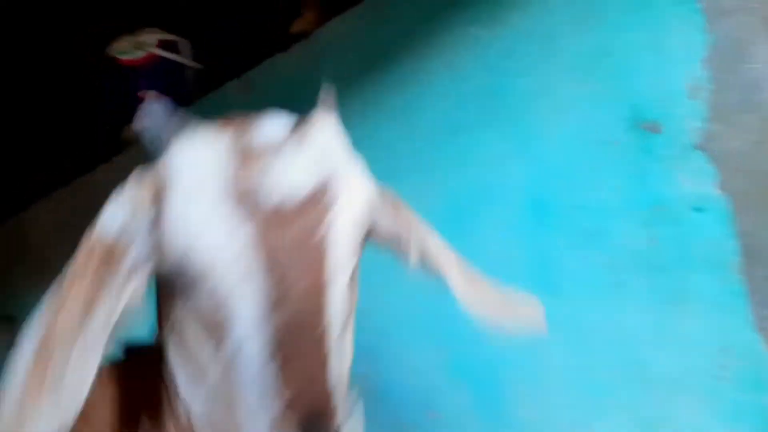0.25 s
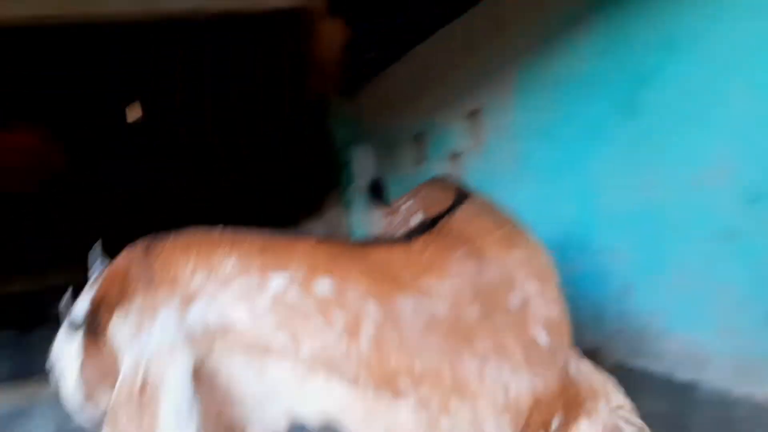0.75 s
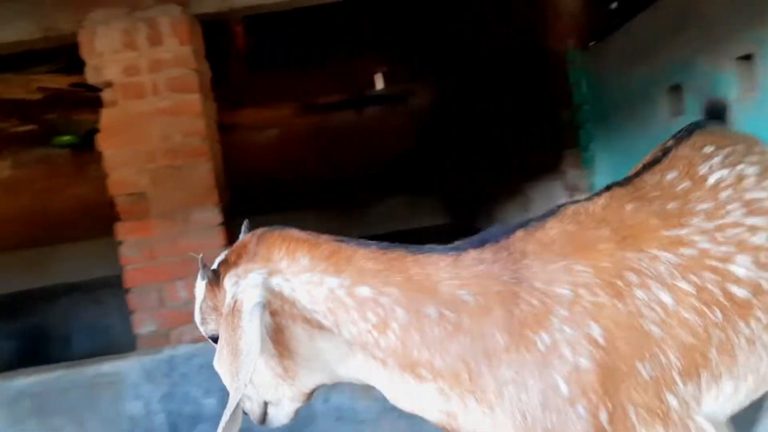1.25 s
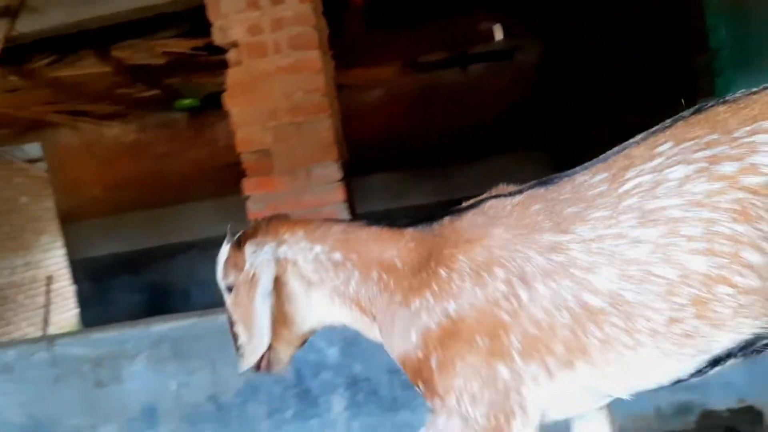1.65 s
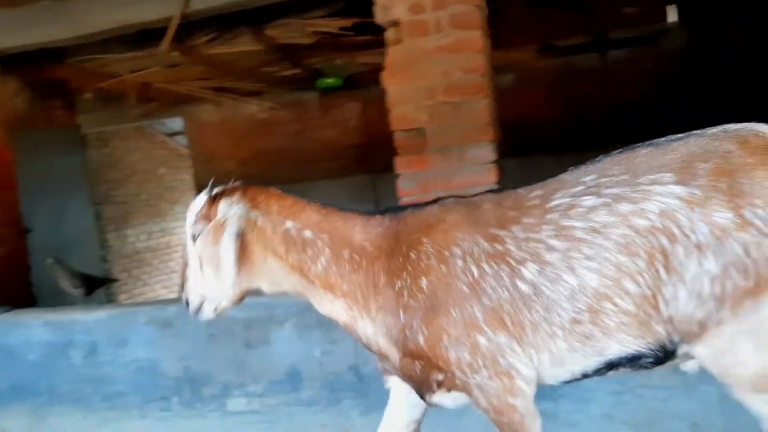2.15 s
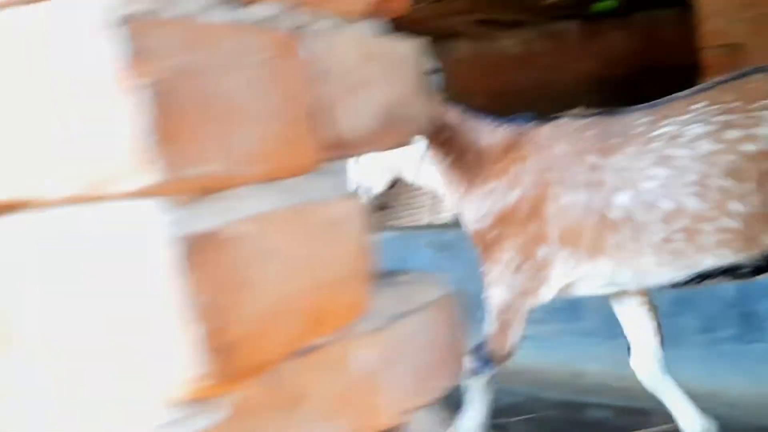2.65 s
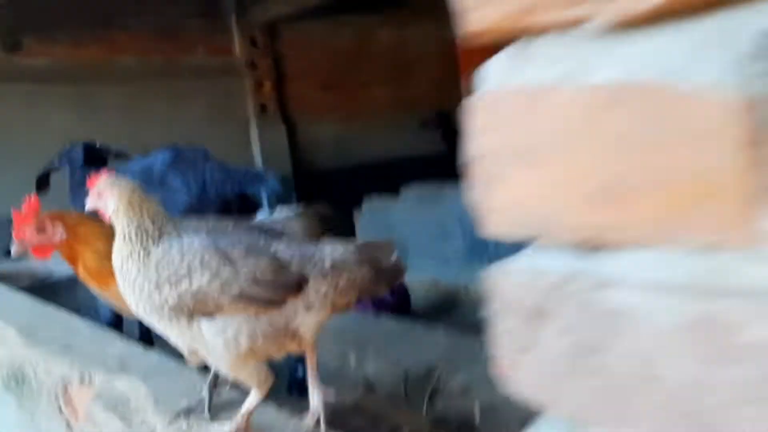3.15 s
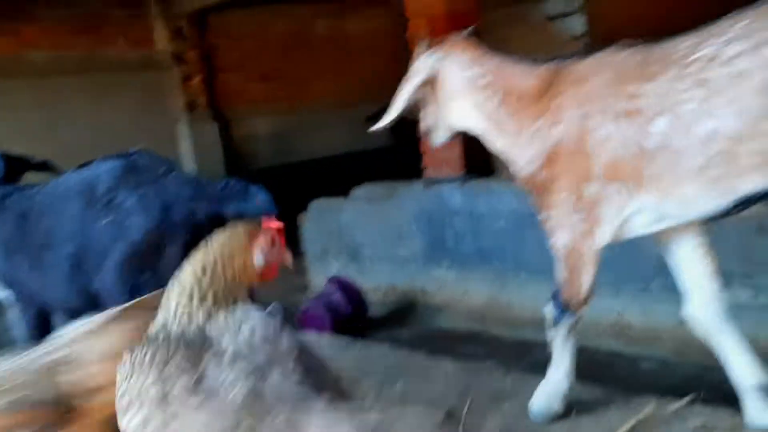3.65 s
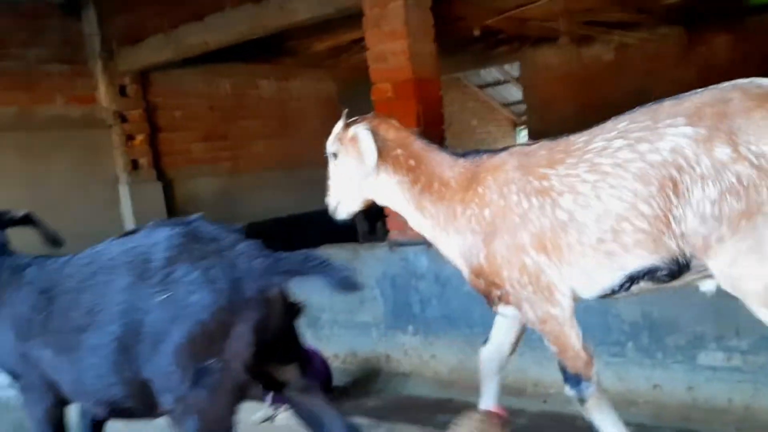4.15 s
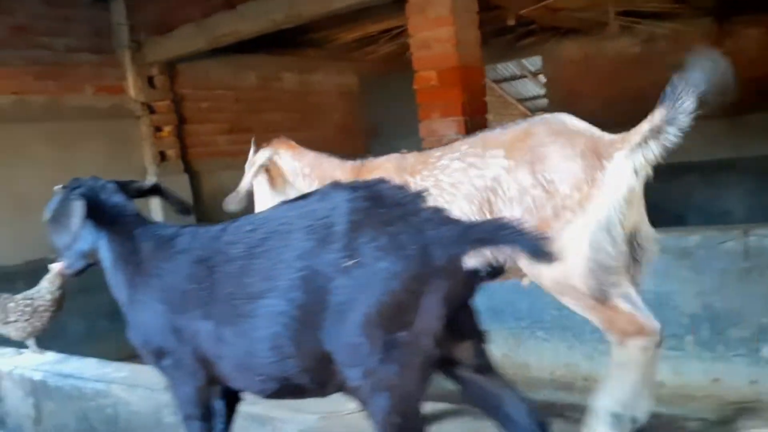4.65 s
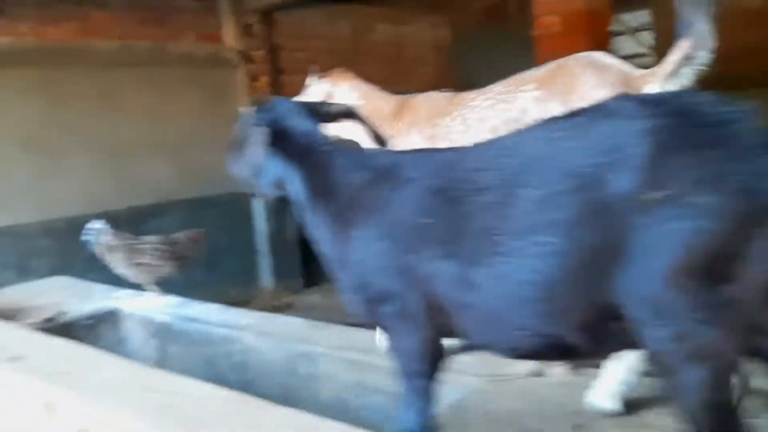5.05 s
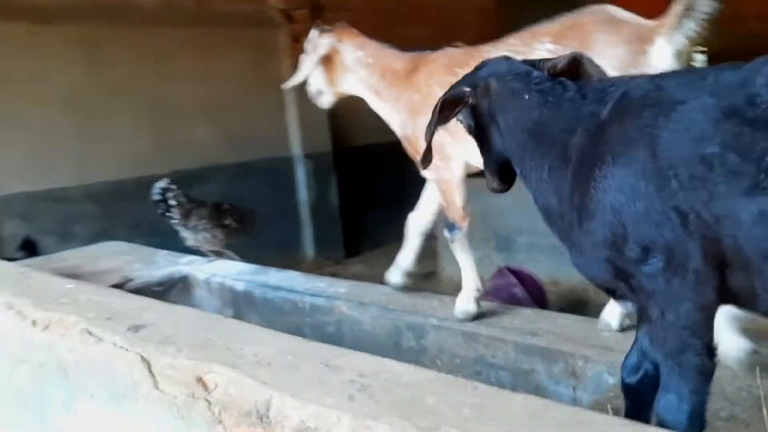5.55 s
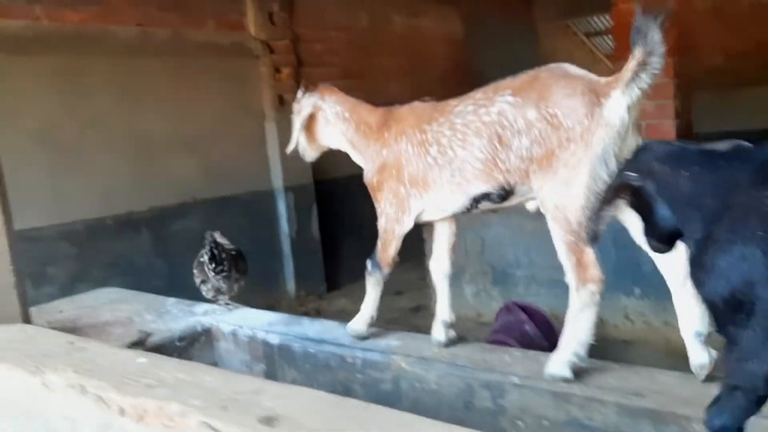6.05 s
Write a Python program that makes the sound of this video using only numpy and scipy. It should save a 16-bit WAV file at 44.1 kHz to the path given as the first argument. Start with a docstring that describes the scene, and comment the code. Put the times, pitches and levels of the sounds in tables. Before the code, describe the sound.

A near kid goat gives three loud quavering bleats, answered by other kids, with chick peeps, hen clucks and hooves scuffing on a hard floor.

```python
"""Chicks peep over a treble hiss and a low murmur; then young goats bleat in an echoing shed.
A near kid bleats three times, another once, a far one twice; hens cluck, hooves knock and scuff.
Voices are drifting partials plus breath through throat resonances; peeps are gliding whistles.
Hooves are decaying filtered noise, the bed is random spectra, walls are sparse decaying echoes.
Table levels are those ahead of the mix gains."""
import sys
import numpy as np
from scipy import signal
from scipy.fft import rfft, irfft, next_fast_len
from scipy.io import wavfile
from scipy.ndimage import uniform_filter1d

SR = 44100
rng = np.random.default_rng(int(sys.argv[2]) if len(sys.argv) > 2 else 0)


def output_pcm(signal):
    """Save a mono or channel-first signal as 16-bit PCM at the path in sys.argv[1].

    Samples are clipped to [-1, 1] before scaling.
    """
    pcm = np.clip(np.atleast_2d(signal).T, -1, 1) * 32767
    wavfile.write(sys.argv[1], SR, np.round(pcm).astype(np.int16))


N = 278271


def amp(db):
    """Amplitude ratio of a level in dB."""
    return 10 ** (np.asarray(db) / 20)


def evened(x):
    """Scale to rms 1."""
    return x / np.sqrt(np.mean(x ** 2) + 1e-20)


def read(points, hz):
    """Interpolate a (Hz, value) table along log frequency."""
    f, value = np.transpose(points)
    return np.interp(np.log(hz + 1), np.log(f + 1), value)


def add(mix, start_s, sound):
    """Add a sound to a track in place, cut at the track's end."""
    part = mix[round(start_s * SR):][:len(sound)]
    part += sound[:len(part)]


def wobble(size, hz):
    """Smoothed noise of rms 1, changing about hz times a second."""
    span = max(int(SR / hz), 1)
    once = uniform_filter1d(rng.standard_normal(size), span)
    return evened(uniform_filter1d(once, span))


# likeness of the noise at both sides: freq_hz, likeness_0_to_1
SIDE_LIKENESS = [(60, .95), (400, 0.85), (1000, 0.17), (2500, 0.51), (8000, 0.26)]


def noise(spectrum, lo_hz, hi_hz, patchy_db, flicker_db, size):
    """Stereo noise from random short-time spectra in patches, of rms 1 between lo_hz and hi_hz."""
    frames = 4 * N // size + 6
    hz = np.fft.rfftfreq(size, 1 / SR)
    a, b, c, d, patches = rng.standard_normal((frames, len(hz), 5)).T
    patches = uniform_filter1d(patches, 8, axis=0)  # across frequency, then time
    patches = evened(uniform_filter1d(patches, 20, axis=1))
    flicker = evened(uniform_filter1d(rng.standard_normal(frames), 4))
    same = read(SIDE_LIKENESS, hz)[:, None]
    left = a + 1j * b
    right = same * left + np.sqrt(1 - same ** 2) * (c + 1j * d)
    z = np.array([left, right])
    z *= amp(read(spectrum, hz)[:, None] + patchy_db * patches + flicker_db * flicker)
    band = (hz >= lo_hz) & (hz <= hi_hz)
    share = np.sqrt((abs(z[:, band]) ** 2).sum() / (abs(z) ** 2).sum())
    sound = signal.istft(z, nperseg=size, noverlap=3 * size // 4)[1][:, :N]
    return evened(sound) / share


# level of the treble hiss (stirred litter, and the kids' breath while they bleat): time_s, level_db
HISS = [(0, -60), (.2, -65), (.87, -67), (1.15, -51.5), (1.72, -48.5), (1.86, -61.5), (2.22, -51.5),
        (3.0, -51.5), (3.14, -58.5), (3.2, -45), (3.92, -53), (4.02, -57), (5.21, -67), (5.33, -55.5),
        (6.0, -48.5), (6.17, -60)]
# single rustles of litter: crest_s, level_db, fade_db_per_s
RUSTLES = [(0.449, -57, 98), (.7, -59, 130), (0.901, -53.5, 48), (1.955, -48, 74), (2.1, -59, 65),
           (4.2, -52.5, 60), (4.33, -46.5, 23), (4.68, -47, 38), (6.282, -48, 30)]
# swells of the shed's murmur: time_s, level_db
BUSTLE = [(0.0, -62), (0.54, -66.5), (1.19, -48), (1.69, -54), (3.6, -52.5), (4.78, -64), (5.31, -58),
          (5.52, -50.5), (6.31, -59.5)]
# noise spectra of hiss, murmur and rumble: freq_hz, density_db_per_hz
HISS_SPECTRUM = [(350, -68), (600, -99), (748, -65), (1140, -9), (1230, -5), (3080, 4.5), (3730, 7.5),
                 (9240, -2.5), (14900, -2), (16000, 1)]
MURMUR_SPECTRUM = [(120, -32), (200, -10), (481, -3.5), (620, -3.5), (1050, -8), (1280, -9.5), (2500, -10),
                   (3250, -6.5), (5500, -120)]
RUMBLE_SPECTRUM = [(12, -47), (20, -41), (70, 5), (156, -0.5), (200, -3.5), (260, -9), (440, -120)]
RUSTLE_RISE_DB_PER_S = 350
RUMBLE_DB = -68


def background():
    """Treble hiss of litter and breath over the shed's murmur; a rumble follows the murmur a little."""
    t = np.arange(N) / SR
    hiss_db = np.interp(t, *np.transpose(HISS))
    murmur_db = np.interp(t, *np.transpose(BUSTLE))
    rumble_db = RUMBLE_DB + .3 * (murmur_db - murmur_db.mean())
    power = amp(hiss_db) ** 2
    for crest_s, db, fade_db_per_s in RUSTLES:
        drop_db = np.maximum(RUSTLE_RISE_DB_PER_S * (crest_s - t), fade_db_per_s * (t - crest_s))
        power += amp(db - drop_db) ** 2
    hiss = noise(HISS_SPECTRUM, 8400, 15100, patchy_db=1, flicker_db=1.5, size=512)
    murmur = noise(MURMUR_SPECTRUM, 200, 900, patchy_db=2.5, flicker_db=2, size=1024)
    rumble = noise(RUMBLE_SPECTRUM, 30, 200, patchy_db=-2.5, flicker_db=3.0, size=2048)
    return np.sqrt(power) * hiss + amp(murmur_db) * murmur + amp(rumble_db) * rumble


# decay of the shed's echo: freq_hz, t60_s
WALL_DECAY = [(200, 0.39), (1000, 0.41), (4000, 0.34), (10000, 0.11)]


def walls(x):
    """Sparse echoes of random sign, unlike at each side, each band dying at its own speed."""
    taps = np.zeros((2, SR // 2))
    slots = np.arange(200, SR // 2 - 20, 20)
    at = slots + rng.integers(0, 20, (2, (SR // 2 - 201) // 20))
    np.put_along_axis(taps, at, rng.choice([-1., 1.], at.shape), 1)
    hz, t, z = signal.stft(taps, SR, nperseg=256)
    decay = amp(-60 * t / read(WALL_DECAY, hz)[:, None])
    tail = signal.istft(z * decay, SR, nperseg=256)[1]
    return signal.fftconvolve(x[None], tail / np.linalg.norm(tail[0]), axes=1)[:, :N]


# first reflections off floor, trough and pillar, one list per side (left, right): delay_s, level_db
BOUNCES = [
    [(.0016, -7), (.0043, -12.5), (.0091, -6), (.015, -5)],
    [(.0023, -8), (.0056, -11), (.0078, -8), (.018, -3.5)],
]


def nearby(x):
    """Early reflections, mostly treble, reach each port at other moments."""
    treble = signal.lfilter(*signal.butter(1, 500, "high", fs=SR), x)
    out = x.copy()
    for side, taps in enumerate(BOUNCES):
        for delay_s, db in taps:
            add(out[side], delay_s, amp(db) * treble[side][:N - round(delay_s * SR)])
    return amp(-1.0) * out


# hoof knocks: start_s, level_db, tick_db (against the body)
KNOCKS = [(0.359, -46, -12), (0.968, -35.5, -20), (2.148, -31, -4), (2.299, -33, -8), (4.194, -27.5, 4),
          (4.242, -45, -15)]
# hoof scuffs: start_s, level_db, centre_hz
SCUFFS = [(0.136, -49, 744), (0.294, -44.5, 1240), (0.97, -31.5, 1730), (2.289, -32.5, 1150),
          (4.443, -37, 882), (4.494, -38, 760), (4.584, -46, 607), (4.957, -43.5, 815), (4.99, -32.5, 780),
          (5.33, -31, 1030), (5.375, -34, 1140), (6.17, -42, 1000), (6.279, -37, 690)]
KNOCK_HZ, KNOCK_WIDTH_HZ, KNOCK_T60_S, KNOCK_RISE_S = 298, 490, .13, .0013
SCUFF_WIDTH_HZ, SCUFF_T60_S, SCUFF_RISE_S, SCUFF_TICK_DB = 920, 0.18, .006, -23
TICK_T60_S = 0.054


def hooves():
    """A burst of grit rings the floor briefly; a bright tick leads it."""
    out = np.zeros(N)
    t = np.arange(8192) / SR
    f = np.fft.rfftfreq(len(t), 1 / SR)
    knocks = [(s, db, KNOCK_HZ, KNOCK_WIDTH_HZ, KNOCK_T60_S, KNOCK_RISE_S, tick_db)
              for s, db, tick_db in KNOCKS]
    scuffs = [(s, db, hz, SCUFF_WIDTH_HZ, SCUFF_T60_S, SCUFF_RISE_S, SCUFF_TICK_DB)
              for s, db, hz in SCUFFS]
    for s, db, hz, width_hz, t60_s, rise_s, tick_db in knocks + scuffs:
        grit = rng.standard_normal((2, len(t)))
        resonance = f / (f + 300) / (1 + (2 * (f - hz) / width_hz) ** 2)
        body = evened(irfft(rfft(grit[0]) * resonance))
        shape = (1 - np.exp(-t / rise_s)) * amp(-60 * t / t60_s)
        tick = amp(tick_db - 60 * t / TICK_T60_S) * grit[1]
        add(out, s, amp(db - 6.0) * (body * shape / shape.max() + tick))
    return out


# chick peeps: start_s, length_s, first_hz, last_hz, bend_exponent (over 1 holds then drops), level_db
PEEPS = [(0, 0.046, 4260, 4070, 3.2, -52), (0, 0.15, 5540, 3330, 1.27, -53.5),
         (0.098, 0.097, 4080, 3590, 0.48, -59), (0.206, 0.13, 4620, 3500, 1.83, -49.5),
         (0.303, 0.15, 5370, 3200, 2.1, -54), (.38, 0.092, 4630, 4100, .7, -55.5),
         (0.531, 0.15, 5670, 3280, 1.7, -60), (0.601, .16, 5120, 3500, 0.72, -50.5),
         (0.764, 0.11, 5200, 3770, 2.2, -53.5), (1.849, 0.079, 4560, 4070, 0.87, -49.5),
         (1.89, 0.055, 3970, 3310, 1.3, -44.5), (1.984, 0.092, 5160, 3970, 0.43, -49),
         (2.086, 0.13, 5450, 4130, 0.62, -51), (3.068, 0.062, 3580, 3260, 1.3, -52),
         (3.135, 0.073, 4186, 3630, 1.3, -36.5), (3.966, 0.092, 4165, 3630, 1.5, -46),
         (4.237, 0.14, 5480, 3980, 0.32, -43), (4.663, 0.13, 5600, 3660, .4, -43.5),
         (4.961, 0.099, 5180, 3540, 0.47, -55), (5.138, 0.087, 5470, 3900, 0.7, -58.5),
         (6.03, 0.1, 3716, 3190, 1.45, -52.5)]


def chicks():
    """Each peep is a slightly unsteady whistle that bends downward."""
    out = np.zeros(N)
    for s, length_s, first_hz, last_hz, bend, db in PEEPS:
        u = np.arange(int(length_s * SR)) / (length_s * SR)
        glide_hz = first_hz + (last_hz - first_hz) * u ** bend
        hz = glide_hz * (1 + 0.005 * wobble(len(u), 186))
        swell = np.sqrt(2 * np.sin(np.pi * u))
        add(out, s, amp(db) * swell * np.sin(2 * np.pi * np.cumsum(hz) / SR))
    return out


def throat_gain(throat, hz, progress):
    """Gain of a set of steep resonances, some drifting in the course of a call."""
    gain = 0
    for f, width_hz, db, *drift in throat:
        centre_hz = f * (1 + sum(drift) * progress)
        gain = gain + amp(db) / (1 + (2 * (hz - centre_hz) / width_hz) ** 2)
    return gain


STRAIN_DB, EASED_DB = 12, 5  # strain ends this far under peak effort; breath gained per unit of strain
CREAK = .8  # pitch unrest of a shut mouth, against full strain
CLEAR_COUNT, RASP_HZ = 3, 220  # lowest partials free of rasp; speed of the rasp
STEADY = (0, 1, 0)  # no quaver


def call(rows, throat, quaver, mouth_law, sag_db, calm_db, trough, jitter, breath_db, shut_db, rasp=0):
    """Vocal folds slacken between crests: pitch and level sag together; effort adds quaver and mouth."""
    s, effort_db, crest_hz = np.transpose(rows)
    crest_s, period_s, deepest = quaver
    widest, shut_below_db, opening_db = mouth_law
    t = np.arange(s[0], s[-1], 1 / SR)
    below_db = effort_db.max() - np.interp(t, s, effort_db)
    push = np.clip(1 - (below_db / calm_db) ** 2, 0, 1)
    strain = np.clip(1 - below_db / STRAIN_DB, 0, 1)
    mouth = widest * np.clip((shut_below_db - below_db) / opening_db, 0, 1)

    u = (t - crest_s) / period_s % 1
    dip = np.minimum(u / trough, (1 - u) / (1 - trough))
    slack = deepest * np.sin(np.pi / 2 * dip) ** 1.5
    # hoarse at full effort, creaky when shut
    unrest = jitter * (0.019 + deepest * (strain + CREAK * (1 - mouth)))
    hz = np.interp(t, s, crest_hz) * (1 - push * slack) * (1 + unrest * wobble(len(t), 152))
    turns = np.cumsum(hz) / SR

    k = np.arange(1, 30)[:, None]
    coarse = slice(None, None, 32)  # partial gains are set every 32 samples
    progress = (t - s[0]) / (s[-1] - s[0])
    gains = throat_gain(throat, k * hz[coarse], progress[coarse])
    gains *= amp(shut_db * (1 - mouth[coarse]) * np.log2(k))  # a shut mouth dulls
    gains /= np.sqrt((gains ** 2).sum(0) / 2)
    folds = np.zeros(len(t))
    for n, gain in zip(k[:, 0], gains):
        breakup = 1 + rasp * strain * (n > CLEAR_COUNT) * wobble(len(t), RASP_HZ)
        start_turn = (rasp > 0) * rng.random()
        partial = np.cos(2 * np.pi * (n * turns + start_turn))
        folds += np.interp(t, t[coarse], gain) * breakup * partial

    air = rng.standard_normal(len(t)) * (1 + np.cos(2 * np.pi * turns))  # puffs with each cycle
    f = np.fft.rfftfreq(len(t), 1 / SR)
    air = evened(irfft(rfft(air) * throat_gain(throat, f, 0.23) * f / (f + 2500), len(t)))
    breath = amp(breath_db - EASED_DB * (1.5 - strain)) * mouth ** 2 * air
    level_db = effort_db.max() - below_db - sag_db * np.sqrt(push) * slack
    return s[0], amp(level_db) * signal.windows.tukey(len(t), .05) * (folds + breath)


# hen clucks: start_s, length_s, peak_db, first_hz, last_hz, mouth_0_to_1
HENS = [(.635, 0.066, -49.5, 604, 640, 0.65), (0.722, 0.18, -38.5, 323, 303.5, 0.3),
        (0.956, 0.11, -31.5, 288, 345, 0.67), (2.919, .035, -31.5, 1052, 530, .63),
        (3.56, .035, -37, 800, 586, 0.2), (4.059, 0.0252, -35.5, 1138, 614, 0.99),
        (6.152, 0.15, -40.5, 415, 375, 1)]
# hen throat resonances: centre_hz, width_hz, level_db
HEN_THROAT = [(307, 44, 5), (737, 145, 3), (1300, 700, -12.5), (2440, 600, -22)]
CLUCK_RISE, CLUCK_START_DB, CLUCK_END_DB = 0.45, -11, -19  # swelling share; ends against the peak


def hens():
    """Each cluck is a breathy voice that swells and fades along one glide."""
    out = np.zeros(N)
    for s, length_s, db, first_hz, last_hz, mouth in HENS:
        peak_hz = first_hz + CLUCK_RISE * (last_hz - first_hz)
        rows = [(s, db + CLUCK_START_DB, first_hz),
                (s + CLUCK_RISE * length_s, db, peak_hz),
                (s + length_s, db + CLUCK_END_DB, last_hz)]
        held = (mouth, 60, 1)  # stays open all through
        add(out, *call(rows, HEN_THROAT, STEADY, held, sag_db=0, calm_db=1, trough=.5,
                       jitter=0.48, breath_db=-1.0, shut_db=-11))
    return out


# In the kids' settings below:
# quaver: crest_s, period_s, deepest_pitch_sag_0_to_1
# mouth: widest_0_to_1, shut_below_peak_db, opening_range_db

# far kid, one list per bleat: time_s, effort_db, crest_pitch_hz
FAR_KID = [
    [(.83, -49.5, 374.7), (.9, -48.5, 409.8), (1.07, -45.5, 440), (1.55, -53, 423), (1.68, -50, 405.4)],
    [(2.17, -40, 457.3), (2.44, -48.5, 486), (2.49, -35, 498.5), (2.72, -33.5, 487.2), (2.82, -49, 391)],
]
# far kid's throat resonances: centre_hz, width_hz, level_db
FAR_THROAT = [(480, 500, -36), (1011, 63, 2), (1234, 140, -7), (1943, 340, -6.5), (3620, 2400, -4)]
FAR_MOUTH = (0.84, 24.7, 18.7)


def far_kid():
    """Vocal folds without quaver, through a throat dulled as the mouth shuts."""
    out = np.zeros(N)
    for rows in FAR_KID:
        add(out, *call(rows, FAR_THROAT, STEADY, FAR_MOUTH, sag_db=0, calm_db=1, trough=.5,
                       jitter=.26, breath_db=-15, shut_db=-23))
    return out


# other kid's one bleat: time_s, effort_db, crest_pitch_hz
OTHER_KID = [(1.82, -59, 315), (1.95, -50.5, 335), (2.12, -43.5, 376.3), (2.19, -46, 396),
             (2.215, -29, 400), (2.357, -23.5, 431), (2.61, -22.5, 421), (2.79, -27, 401),
             (2.945, -30, 387.1), (3.035, -34, 345), (3.07, -50, 325)]
# other kid's throat resonances: centre_hz, width_hz, level_db, drift_share (where given, over the call)
OTHER_THROAT = [(420, 150, -30), (850, 200, -19), (1180, 120, -1.5, -.06), (2480, 250, -12),
                (2850, 250, -7), (3750, 450, 0, .19), (5800, 450, -16), (7000, 700, -19),
                (13000, 5000, -45)]
OTHER_QUAVER, OTHER_MOUTH = (2.527, .0848, .058), (0.97, 27, 22)


def other_kid():
    """Quavering folds with little breath, through a throat that drifts during the bleat."""
    out = np.zeros(N)
    add(out, *call(OTHER_KID, OTHER_THROAT, OTHER_QUAVER, OTHER_MOUTH, sag_db=75, calm_db=8,
                   trough=.22, jitter=.02, breath_db=-26, shut_db=-18))
    return out


# near kid, one list per bleat: time_s, effort_db, crest_pitch_hz
NEAR_KID = [
    [(1.07, -44.5, 411), (1.146, -37.5, 435.8), (1.222, -26, 477.4), (1.315, -15.5, 516.6),
     (1.4, -12.5, 497.2), (1.568, -15, 499), (1.654, -24.5, 470.8), (1.73, -26, 425), (1.765, -34, 327),
     (1.82, -54, 244.3)],
    [(3.13, -50, 362), (3.175, -36.5, 456), (3.215, -34, 484.6), (3.258, -12.5, 511.7),
     (3.345, -12.5, 537.1), (3.54, -13.5, 545), (3.66, -16.5, 515), (3.82, -22.5, 462.8), (3.875, -38, 404),
     (3.91, -37, 321.5), (3.98, -58, 337)],
    [(5.24, -48, 295), (5.3, -60, 296.5), (5.345, -37, 408.3), (5.41, -36, 457.5), (5.44, -14.5, 520),
     (5.524, -12.5, 533), (5.686, -14.5, 538.7), (5.856, -22, 485.5), (5.97, -39, 350.6), (6.06, -70, 322)],
]
# near kid's throat resonances: centre_hz, width_hz, level_db
NEAR_THROAT = [(447, 1600, -28.5), (1055, 135, 2), (1640, 300, -14), (2564, 246, -4.5), (3603, 1030, -3.5),
               (4400, 330, -6.5), (5320, 570, -15), (6660, 1570, -14), (8360, 460, -16.5),
               (12850, 2200, -30.5)]
# near kid's quaver, bleat by bleat: crest_s, period_s, deepest_pitch_sag_0_to_1
NEAR_QUAVER = [(1.4, 0.082, 0.08), (3.5, 0.08, 0.12), (5.605, .0812, .12)]
# near kid's hoarseness, bleat by bleat: sag_db_per_unit, jitter_scale, breath_db (before easing)
HOARSENESS = [(200, .11, -12), (110, .12, -9.5), (100, .13, -9.5)]
# near kid's main resonance, bleat by bleat, against its throat table: level_db
RING_DB = [-5, -.3, .3]
NEAR_MOUTH = (0.86, 34.3, 16)
NEAR_RASP = (.35, .7, .7)  # overtone flicker rms at full strain, bleat by bleat


def near_kid():
    """Quavering hoarse folds; strain breaks up the upper overtones."""
    out = np.zeros(N)
    bleats = zip(NEAR_KID, NEAR_QUAVER, HOARSENESS, NEAR_RASP, RING_DB)
    for rows, quaver, (sag_db, jitter, breath_db), rasp, ring_db in bleats:
        low, (hz, width_hz, db), *high = NEAR_THROAT
        throat = [low, (hz, width_hz, db + ring_db), *high]
        add(out, *call(rows, throat, quaver, NEAR_MOUTH, sag_db, calm_db=19, trough=0.403,
                       jitter=jitter, breath_db=breath_db, shut_db=-18, rasp=rasp))
    return out


def scene():
    """Direct sound with early reflections, wall echo and background."""
    feet, peeps, clucks = hooves(), chicks(), hens()
    far, other, near = far_kid(), other_kid(), near_kid()
    kids = near * amp([[-.6], [-1.5]]) + other * amp([[-3], [.4]]) + amp(-3.5) * far  # left, right dB
    direct = kids + clucks + peeps + feet
    echoed = amp(-8.5) * near + amp(-15) * other + amp(-2.0) * far
    echoed += amp(-1) * peeps + amp(-16.0) * clucks + amp(-14.5) * feet
    return nearby(direct) + walls(echoed) + background()


# colour of the two microphone ports: freq_hz, left_over_right_db
PORT_COLOUR = [(300, 1), (1000, 0), (2400, -2), (4400, -5), (7000, -5), (9000, 9.5), (15000, 4)]
PORT_LAG_S, EDGE_HZ = .00016, 15700  # the right port hears later; upper band limit


def record(dry):
    """Two microphone ports of unlike colour and delay; then a low-pass."""
    size = next_fast_len(N)
    f = np.fft.rfftfreq(size, 1 / SR)
    tilt = amp(read(PORT_COLOUR, f) / 2)
    ports = np.array([tilt, np.exp(-2j * np.pi * f * PORT_LAG_S) / tilt])
    heard = irfft(rfft(dry, size) * ports, size)[:, :N]
    lowpass = signal.firwin(511, EDGE_HZ, window=("kaiser", 9), fs=SR)
    return signal.oaconvolve(heard, lowpass[None], "same")


dry = scene()
out = record(dry)
output_pcm(out)
```